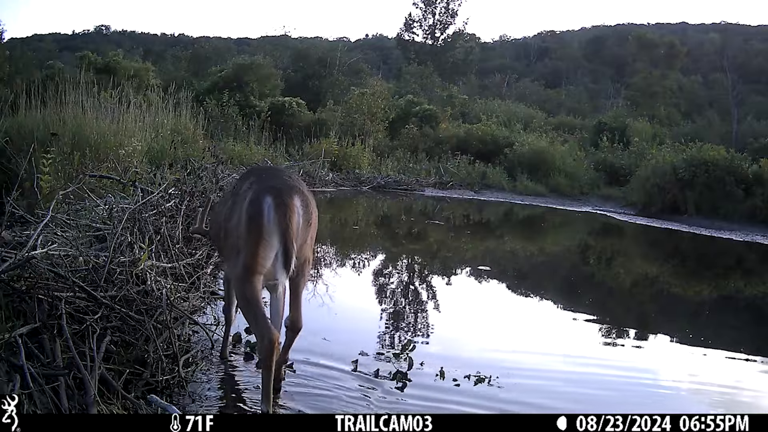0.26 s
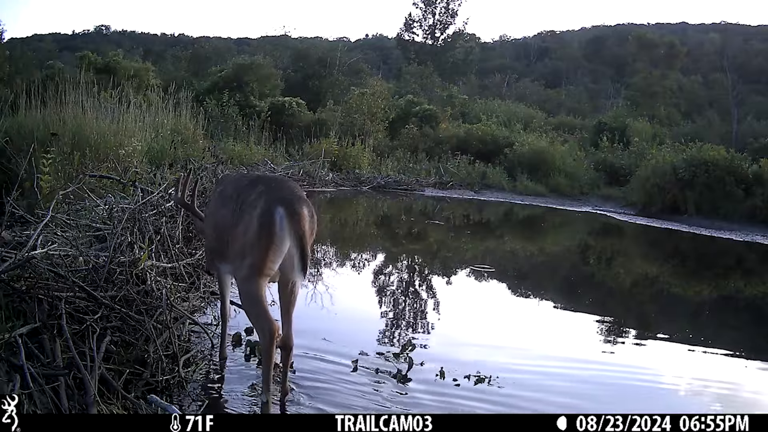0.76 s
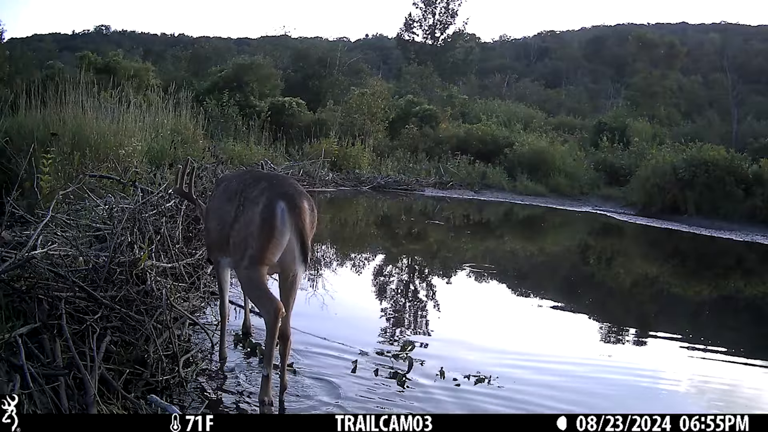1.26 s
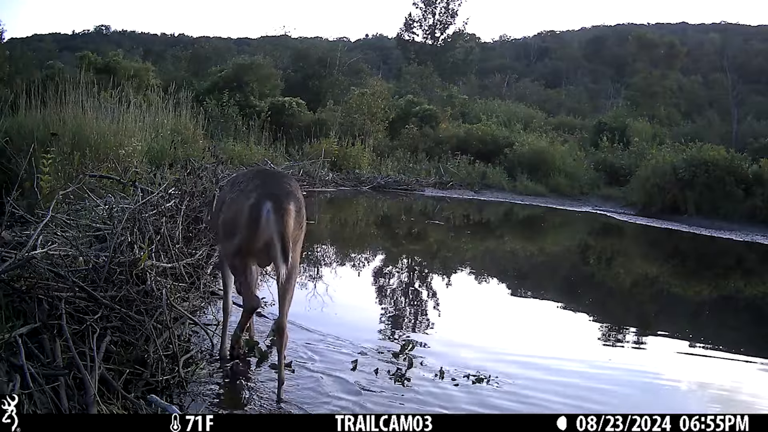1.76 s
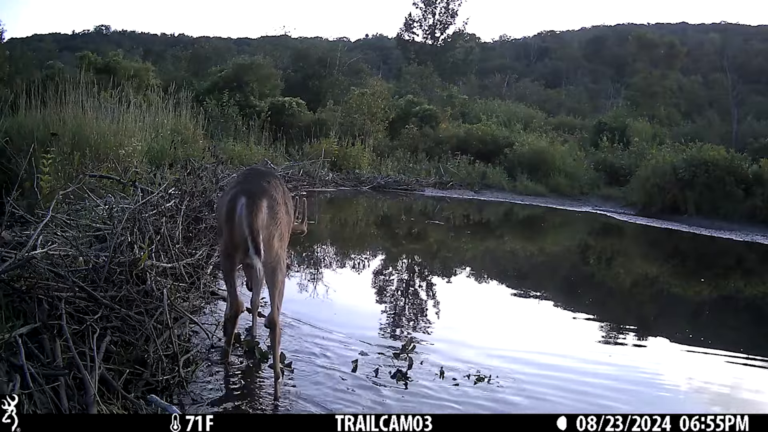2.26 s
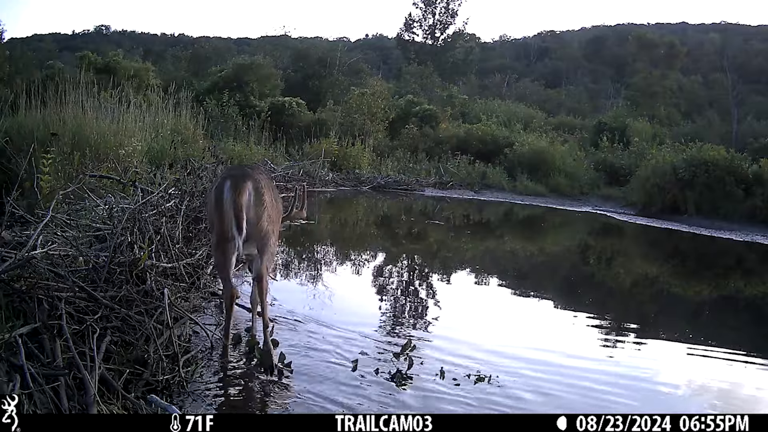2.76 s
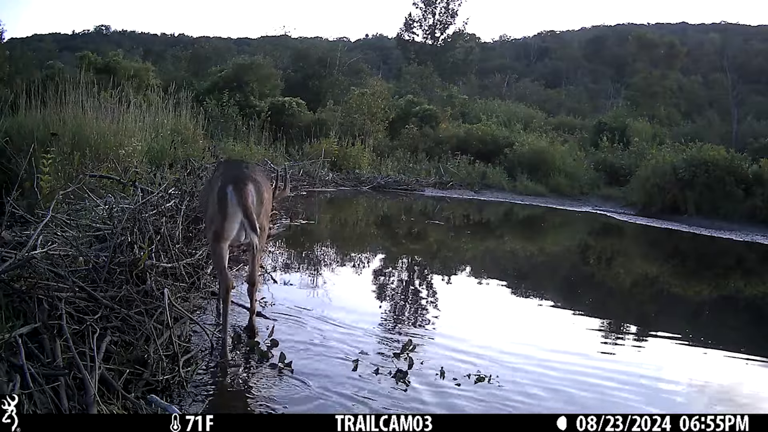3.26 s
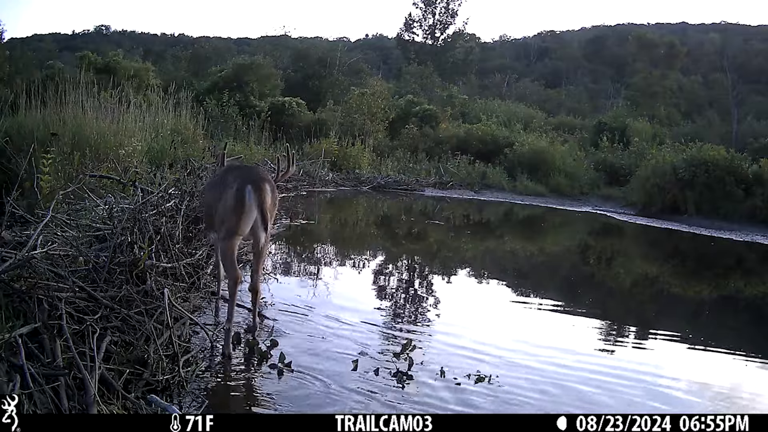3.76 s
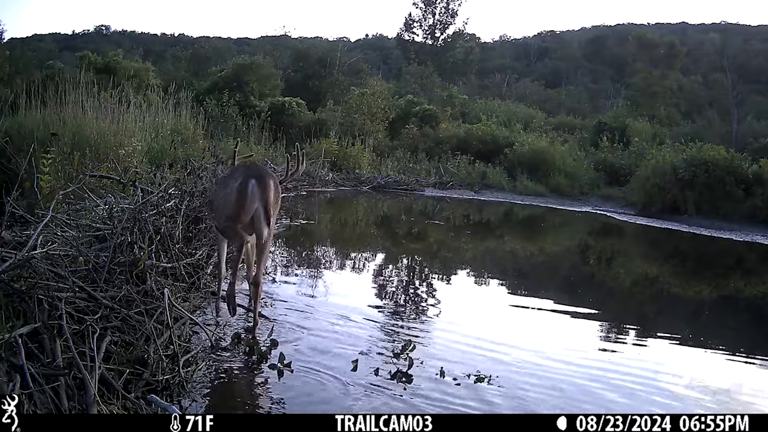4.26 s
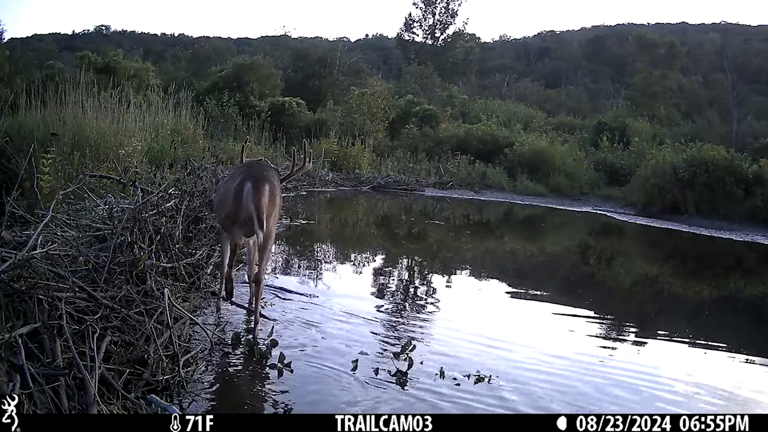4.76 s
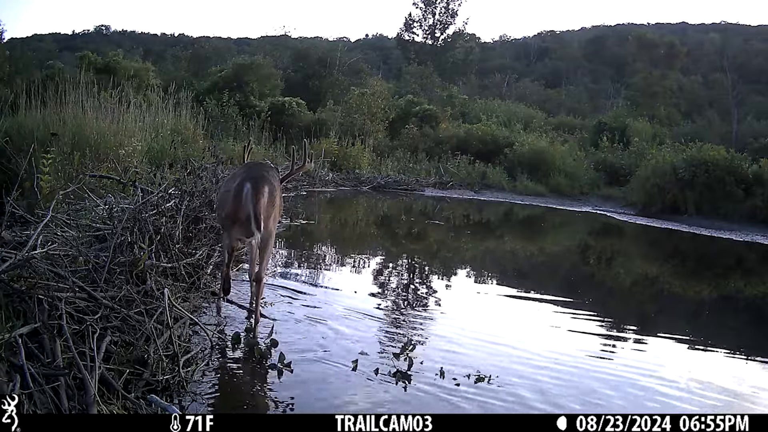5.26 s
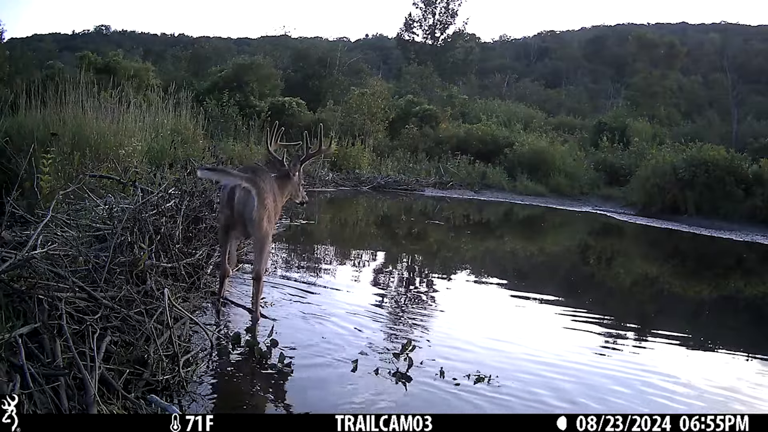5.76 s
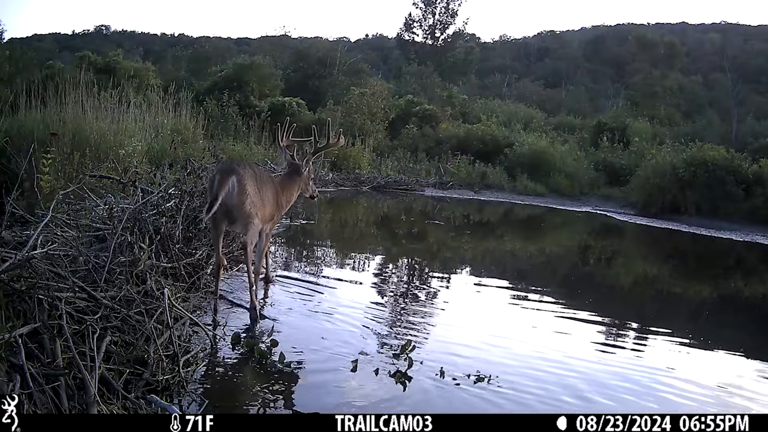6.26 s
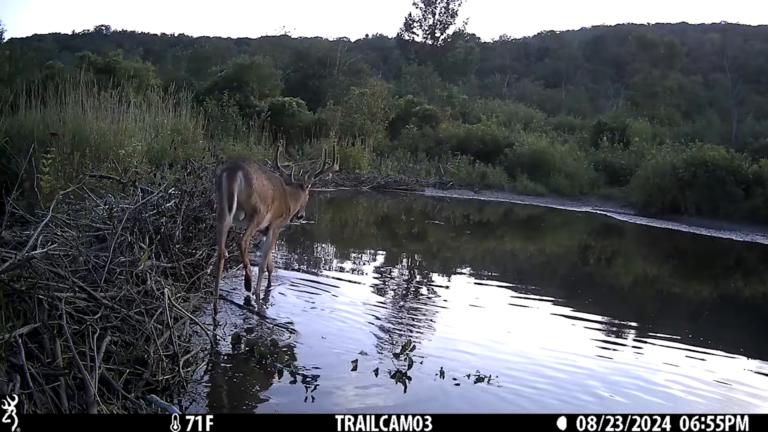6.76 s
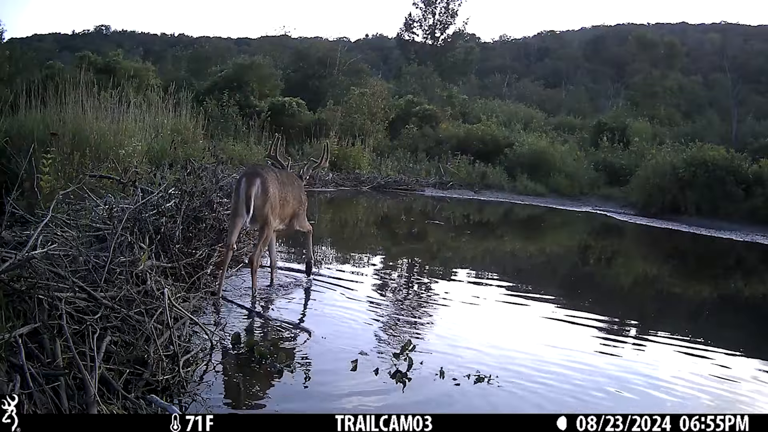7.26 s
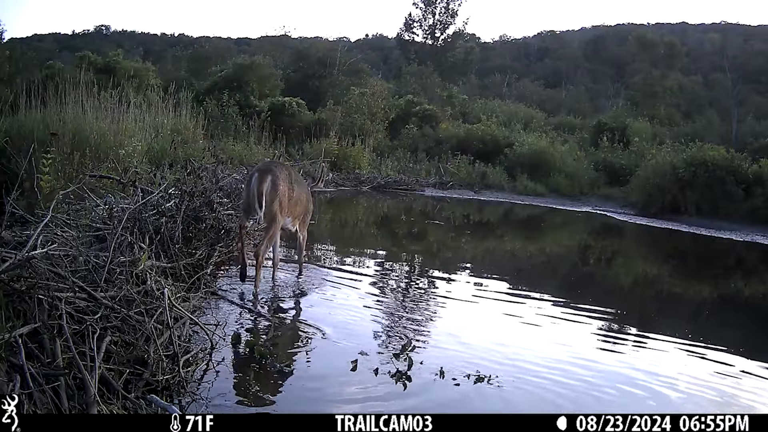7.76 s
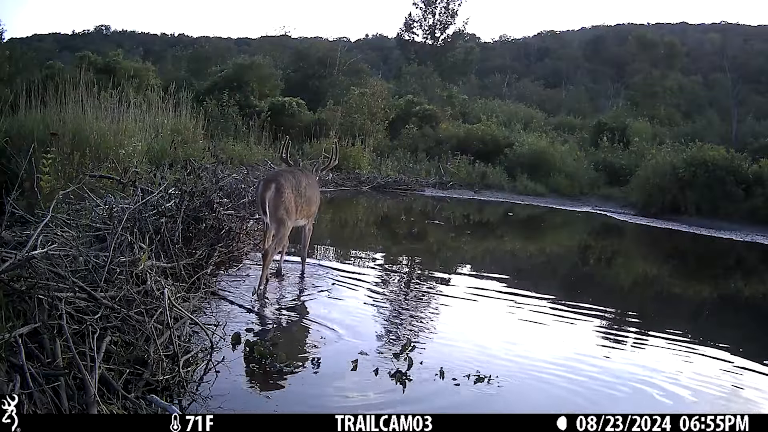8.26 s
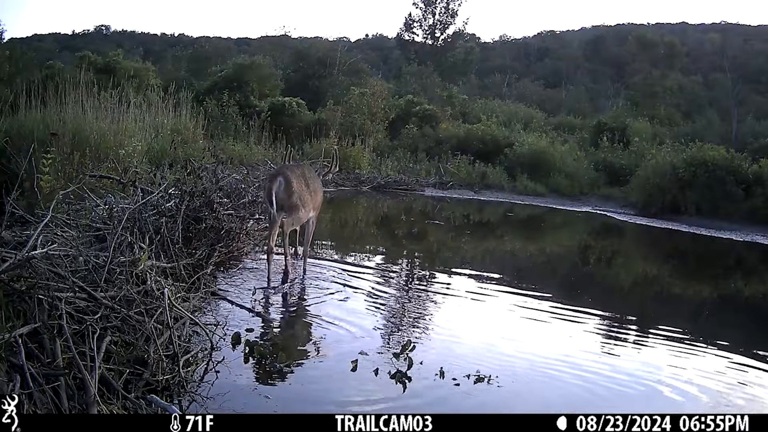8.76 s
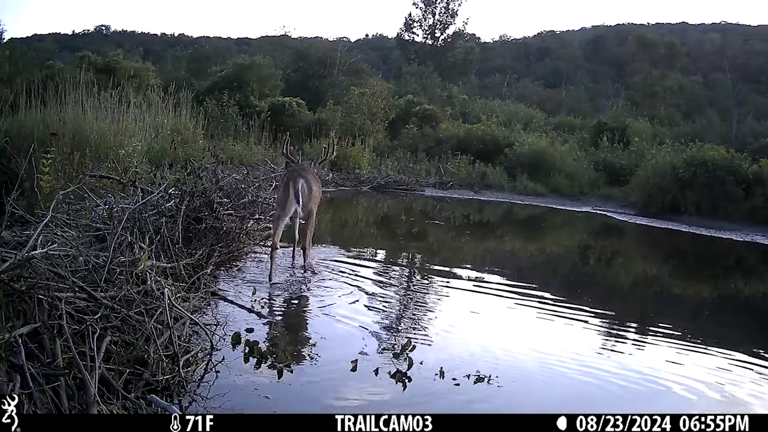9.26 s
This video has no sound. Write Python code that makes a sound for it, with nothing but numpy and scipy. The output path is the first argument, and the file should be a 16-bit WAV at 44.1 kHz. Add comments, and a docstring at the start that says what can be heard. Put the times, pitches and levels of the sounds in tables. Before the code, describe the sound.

A deer wades through a shallow pond, heard through a small microphone that hisses steadily and makes the water sound thin. From the start, its steps make uneven runs of short, light splashes, with ticking drops, soft sloshing and small bubble plops. A stronger splash comes at about 2.4 seconds, and from 2.6 to 3 seconds a dull, low thump shudders close by and dies away. Small splashes follow around 3.5 and 4 seconds. The water then quietens to faint gurgles and a gentle slosh until nearly 6 seconds. The steps pick up again, with clusters of splashes and drips from 6 to about 7.7 seconds and a rounder plop just after 7. A few drops fall a little after 8 seconds, and the sharpest splashes come between 8.9 and 9.5 seconds.

```python
"""Deer wading a shallow pond

Drops smack the surface and trapped air bubbles ring briefly. Spray, droplets and slosh fill
each stride, faint gurgles the gaps; once something low shudders close by. The microphone is a
small one behind a resonant port, and adds its own steady hiss."""
import sys
import numpy as np
from scipy import signal
from scipy.fft import rfft, irfft
from scipy.io import wavfile
from scipy.ndimage import uniform_filter1d

SR = 44100
rng = np.random.default_rng(int(sys.argv[2]) if len(sys.argv) > 2 else 0)


def store_pcm(level_fs):
    """Save levels as 16-bit WAV."""
    pcm = np.round(np.clip(level_fs, -1, 1) * 32767).astype(np.int16)
    wavfile.write(sys.argv[1], SR, np.atleast_2d(pcm).T)


N = 419832
PORT_HZ, PORT_WIDTH_HZ, PORT_TOP_HZ = 3200, 560, 4100

# Drops hitting the pond. Each row: start in seconds, pitch in Hz, peak in dB ahead of the port,
# time to fall 60 dB (t60) in milliseconds.
DROP_IMPACTS = [(0.5242, 3300, -30.5, 16), (0.5341, 2950, -25.5, 8.8), (0.6689, 2300, -35, 15),
                (0.668, 3280, -22.5, 4.4), (0.8222, 3230, -28.5, 14), (0.836, 3860, -40, 15),
                (0.931, 3240, -28.5, 24), (0.938, 2720, -28.5, 24), (1.296, 3220, -20, 13),
                (1.497, 3770, -35, 15), (1.5568, 4050, -36, 2.8), (1.5835, 3500, -25, 4.2),
                (1.59, 4280, -31.5, 4.2), (1.616, 3400, -38, 9), (1.699, 3240, -42, 27),
                (1.6036, 3420, -37.5, 24), (2.0388, 3045, -19.5, 8.1), (2.0572, 3150, -26.5, 3.3),
                (2.3876, 3260, -24.5, 24), (2.4275, 3160, -21.5, 4.3), (2.4385, 3200, -34, 14),
                (2.6396, 3090, -29, 17), (2.7056, 2930, -33, 6.1), (2.7254, 2780, -40, 31),
                (2.7388, 3600, -29, 2.5), (2.823, 3400, -42, 11), (2.861, 3040, -35, 4.2),
                (3.5215, 2690, -32.5, 5.3), (3.643, 2420, -34.5, 7.9), (4.033, 2330, -33, 14),
                (4.0439, 3250, -29.5, 10.5), (4.1071, 2960, -24, 8.4), (4.8585, 3000, -37, 7),
                (5.9886, 3380, -43, 21), (6.2024, 3110, -34, 34), (6.2178, 3510, -28, 13),
                (6.2367, 3030, -35.5, 8.6), (6.3917, 2760, -31, 11), (6.4279, 1600, -26, 7.1),
                (6.436, 1370, -25, 10.5), (6.4622, 3200, -27.5, 13), (6.4779, 3180, -29, 11),
                (6.531, 3500, -38, 3.7), (6.5459, 3020, -29.5, 2.2), (6.553, 3400, -39, 14),
                (7.0222, 2430, -36, 17), (7.0683, 3040, -18.5, 2.6), (7.1578, 3270, -26.5, 20),
                (7.177, 2550, -36, 2.8), (7.2263, 3100, -36, 34), (7.242, 2250, -31.5, 21),
                (7.2527, 2450, -37, 24), (7.308, 2440, -32.5, 8.3), (7.3133, 3400, -33.5, 18),
                (7.4402, 3320, -32, 2.7), (7.517, 3270, -45.5, 35), (7.6323, 3030, -33.5, 9.7),
                (7.694, 3270, -39, 24), (7.7488, 2360, -36.5, 11), (8.1978, 2940, -24, 2.5),
                (8.218, 3140, -31.5, 9), (8.2314, 3450, -29.5, 3.9), (8.36, 3290, -28.5, 14),
                (8.548, 2360, -39, 35), (8.8947, 3140, -25.5, 14), (8.917, 3310, -37, 12),
                (8.9907, 3250, -37, 37), (9.0022, 2350, -39, 14), (9.013, 3150, -31, 13),
                (9.022, 3330, -17, 8.3), (9.0376, 1970, -16.5, 2.5), (9.038, 1430, -19, 5.7),
                (9.0561, 3240, -26, 5.3), (9.1461, 3410, -31.5, 13), (9.2038, 3460, -23.5, 5.7),
                (9.35, 3320, -29, 2.1), (9.3633, 3300, -23, 4.2), (9.4268, 2230, -36, 30),
                (9.4332, 2840, -31, 16), (9.4656, 3430, -34, 40), (9.468, 1920, -21, 8.9),
                (9.4695, 3500, -14, 2), (9.514, 1010, -22, 9.3)]


def smacks():
    """Each drop strikes the surface and rings for an instant."""
    return dying_sines(DROP_IMPACTS, onset_s=0.00017)


def bubbles():
    """Larger pockets of trapped air ring; most climb in pitch as they near the surface."""
    # Each row: start in seconds, pitch in Hz, peak in dB ahead of the port, t60 in milliseconds,
    # glide as a share of the pitch per second.
    air_bubbles = [(0.0156, 1830, -39, 43, -7.5), (0.6417, 970, -41.5, 45, 2),
                   (0.9371, 1400, -40.5, 37, 20), (1.2214, 1025, -46, 67, 3), (2.3951, 789, -35.5, 92, -1),
                   (2.4095, 1430, -35, 46, 5.5), (2.4405, 1765, -29.5, 25, -2.5),
                   (2.632, 1530, -37, 24, 15), (2.737, 1680, -40.5, 34, -2.5), (2.8228, 1490, -39.5, 25, 2),
                   (3.4247, 680, -44.5, 120, -1.5), (3.6307, 1810, -32, 19, 2),
                   (4.0613, 1004, -42, 46, 10.5), (4.085, 1574, -40.5, 49, 4), (4.6, 340, -48.5, 95, 2),
                   (4.887, 1590, -42.5, 62, 1), (4.97, 290, -37.5, 18, 7), (5.0731, 1300, -42, 21, 27),
                   (5.338, 880, -39, 47, 24.5), (5.8796, 347, -40.5, 64, 17), (6.4623, 452, -45, 57, 6),
                   (7.0663, 344, -37.5, 44, -4), (7.0677, 546, -38, 25, 22), (7.068, 1600, -36.5, 19, 12),
                   (7.1091, 394, -24, 14, -17), (7.118, 594, -37, 51, 15.5), (7.5919, 1530, -43, 27, -10),
                   (9.0, 975, -41, 50, -2.5), (9.0802, 1420, -46, 28, 21), (9.197, 806, -38.5, 170, 30),
                   (9.2032, 1260, -35.5, 16, 47), (9.4243, 935, -35, 49, 5), (9.4255, 310, -39.5, 40, 2),
                   (9.4681, 346, -37, 29, 1), (9.4677, 1450, -24, 13, 5), (9.4694, 910, -23, 5.4, 46)]
    return dying_sines(air_bubbles, onset_s=0.00032)


def strides():
    """Gains of spray and slosh: each stir of a leg swells, holds and dies over the calm ripple."""
    # Each row: start in seconds, length in seconds, spray level in dB, slosh level in dB.
    leg_stirs = [(0.012, 0.15, -63, -56), (0.38, 0.12, -66, -54), (0.49, 0.17, -61.5, -60),
                 (0.8, 0.017, -57, -78), (0.919, 0.076, -55.5, -60), (1.207, 0.16, -69, -60.5),
                 (1.462, 0.019, -54, -57), (1.552, 0.21, -59, -62.5), (2.02, 0.03, -57, -81),
                 (2.39, 0.041, -49.5, -48), (2.633, 0.016, -46.5, -49), (2.684, 0.26, -59, -60),
                 (3.39, 0.13, -60, -60.5), (3.625, 0.03, -60, -53.5), (3.794, 0.25, -59, -73),
                 (4.019, 0.086, -54.5, -61), (4.78, 0.46, -83, -62), (5.813, 0.097, -62, -57.5),
                 (5.952, 0.09, -57.5, -62), (6.168, 0.1, -52.5, -72), (6.405, 0.073, -52.5, -54.5),
                 (6.982, 0.42, -55.5, -56.5), (7.155, 0.092, -47, -53), (7.293, .1, -53, -67.5),
                 (7.55, 0.19, -55, -59.5), (8.181, 0.025, -51.5, -68), (8.516, 0.16, -63, -61),
                 (8.889, 0.026, -38, -50), (8.937, 0.056, -46.5, -53), (9.002, 0.04, -52, -45.5),
                 (9.175, 0.07, -55, -56), (9.35, 0.017, -48.5, -72), (9.417, 0.019, -47.5, -46.5),
                 (9.477, .05, -48, -44.5)]
    attack_s, t60_s = 0.013, 0.39
    calm_spray_db, calm_slosh_db = -67.5, -64
    t = np.arange(N) / SR
    power = from_db([[calm_spray_db], [calm_slosh_db]]) ** 2 * np.ones(N)
    for start, length, *levels_db in leg_stirs:
        span = slice(max(round((start - attack_s) * SR), 0), round((start + length + t60_s) * SR))
        swell = np.clip(1 + (t[span] - start) / attack_s, 0, 1)
        decay = from_db(-60 * np.maximum(t[span] - start - length, 0) / t60_s)
        power[:, span] += (from_db(levels_db)[:, None] * swell * decay) ** 2
    return np.sqrt(power)


def slosh(gain):
    """Water pushed by a leg: a crowd of short rings over a smooth rush."""
    rings = grains(400, 700, 2000, cycles=30, spread_db=3.2, clump_db=5)
    rush = band_noise(650, 2300, order=2)
    return gain * (rings + from_db(-4.5) * rush)


def spray(stir_gain):
    """Tiny drops, thrown by legs and smacks, tick broadly; the microphone port rings on each."""
    ticks = grains(700, 1800, 3900, cycles=7.4, spread_db=2.5, clump_db=6)
    radius = np.exp(-np.pi * PORT_WIDTH_HZ / SR)
    angle = 2 * np.pi * PORT_HZ / SR
    port = signal.lfilter([1, 0, -1], [1, -2 * radius * np.cos(angle), radius ** 2], ticks)
    gain = stir_gain + smack_envelope(below_db=21, t60_s=0.045)
    return gain * rms_one(rms_one(port) + 0.21 * ticks)


def puffs():
    """Each smack bursts as a short puff of noise around the port's pitch."""
    gain = uniform_filter1d(smack_envelope(below_db=10, t60_s=0.016), size=64)
    return gain * band_noise(2300, 3700, order=3)


def droplets(stir_gain):
    """Sparser drops fall with the spray and ring longer."""
    return from_db(-7) * stir_gain * grains(70, 2100, 3800, cycles=25, spread_db=4, clump_db=4)


def gurgles():
    """Faint scattered rings in the water, heard between the steps."""
    return from_db(-63) * grains(14, 650, 2000, cycles=70, spread_db=1.8, clump_db=3.5)


def shudder():
    """A low tone with an unsteady, sagging pitch and a weak overtone; it throbs as it dies."""
    # Each row: time of a throb's peak in seconds, level in dB.
    throbs = [(2.645, -38.5), (2.69, -36), (2.742, -31), (2.83, -40), (2.87, -45), (2.945, -45),
              (3.07, -54), (3.15, -54)]
    start_s, start_hz, end_hz, sag_s = 2.627, 64, 30, 0.33
    rise_s, fall_s = 0.03, 0.018
    t = np.arange(N) / SR
    age = np.maximum(t - start_s, 0)
    hz = end_hz + (start_hz - end_hz) * np.exp(-age / sag_s)
    phase = 2 * np.pi * np.cumsum(hz * (1 + 0.07 * drift(22))) / SR
    tone = np.sin(phase) + 0.17 * np.sin(2 * phase)
    gain = np.zeros(N)
    for peak_s, level_db in throbs:
        width_s = np.where(t < peak_s, rise_s, fall_s)
        gain += from_db(level_db) * np.exp(-((t - peak_s) / width_s) ** 2)
    onset = np.minimum(age / 0.013, 1)
    return onset * gain * np.sqrt(2) * tone


def microphone_hiss(level_db, waver_db):
    """The microphone's own coloured noise; the part below 1800 Hz wavers a little."""
    # Each row: frequency in Hz, relative noise density in dB.
    hiss_spectrum = [(15, -19), (25, 4.5), (80, 2.5), (118, -1), (187, 2.5), (600, -0.5), (1620, -12.5),
                     (2330, -16.5), (3110, -12), (3960, -20.5), (4810, -11), (5300, -18), (5980, -25.5),
                     (7800, -28), (8300, -50.5)]
    knot_hz, knot_db = np.array(hiss_spectrum).T
    hz = np.maximum(np.fft.rfftfreq(N, 1 / SR), 1)
    colour = from_db(np.interp(np.log(hz), np.log(knot_hz), knot_db))
    colour[hz > 9086] = 0
    noise = rms_one(irfft(rfft(rng.standard_normal(N)) * colour, N))
    low = signal.sosfiltfilt(signal.butter(2, 1800, fs=SR, output="sos"), noise)
    return from_db(level_db) * (noise - low + low * from_db(waver_db * drift(2.75)))


def dying_sines(rows, onset_s):
    """One sine per row that swells quickly and dies; a longer ring swells more slowly."""
    out, t = np.zeros(N + SR), np.arange(SR // 8) / SR
    for (start, hz, peak_db, t60_ms, *glide), turn in zip(rows, rng.random(len(rows))):
        climb = sum(glide) * t   # zero for a row without a glide
        swell = (1 - np.exp(-t / (onset_s + 0.03 * t60_ms / 1000))) ** 3
        decay = from_db(-60e3 * t / max(t60_ms, 2))
        burst = np.exp(-(climb / 0.8) ** 4)   # a bubble ends once it has glided far enough
        shape = swell * decay * burst
        tone = np.sin(2 * np.pi * (hz * t * (1 + climb / 2) + turn))
        at = round(start * SR)
        out[at:at + len(t)] += from_db(peak_db) * shape / shape.max() * tone
    return out[:N]


def smack_envelope(below_db, t60_s):
    """A gain that jumps at each smack and dies; smacks pitched below the port kick it less."""
    kicks = np.zeros(N)
    for start, hz, peak_db, _ in DROP_IMPACTS:
        kicks[round(start * SR)] = from_db(peak_db - below_db) * min(hz / PORT_HZ, 1) ** 2
    return signal.lfilter([1], [1, -from_db(-60 / (t60_s * SR))], kicks + 1e-18)


def grains(per_s, low_hz, high_hz, cycles, spread_db, clump_db):
    """Random clicks in clumps, dealt to 16 resonators of equal energy; unit rms."""
    sizes = from_db(spread_db * np.minimum(rng.exponential(1, N), 3)) * rng.choice([-1, 1], N)
    clicks = sizes * (rng.random(N) < per_s * from_db(clump_db * drift(25)) / SR)
    dealt = rng.integers(0, 16, N)
    return rms_one(sum(np.sqrt(hz) * ring(clicks * (dealt == k), hz, cycles / hz)
                       for k, hz in enumerate(np.geomspace(low_hz, high_hz, 16))))


def ring(clicks, hz, t60_s):
    """A unit click sets a sine of height 1 ringing."""
    radius, angle = from_db(-60 / (t60_s * SR)), 2 * np.pi * hz / SR
    poles = [1, -2 * radius * np.cos(angle), radius ** 2]
    return signal.lfilter([0, np.sin(angle)], poles, clicks + 1e-18)


def band_noise(low_hz, high_hz, order):
    """Band-passed noise of unit rms."""
    band = signal.butter(order, [low_hz, high_hz], "band", fs=SR, output="sos")
    return rms_one(signal.sosfilt(band, rng.standard_normal(N)))


def drift(rate_hz):
    """A random wander of unit rms: noise at every 40th sample, low-passed twice."""
    pole = np.exp(-2 * np.pi * rate_hz * 40 / SR)
    slow = signal.lfilter([1], [1, -2 * pole, pole ** 2], rng.standard_normal(N // 40 + 2002))[2000:]
    return np.interp(np.arange(N) / 40, np.arange(len(slow)), rms_one(slow))


def from_db(db):
    """Decibels to gain."""
    return 10 ** (np.asarray(db) / 20)


def rms_one(x):
    """Scale to unit rms."""
    return x / np.sqrt(np.mean(x ** 2) + 1e-20)


def scene():
    """The pond through the port, which passes little above its resonance; shudder and hiss beside it."""
    spray_gain, slosh_gain = strides()
    rings = smacks() + bubbles() + droplets(spray_gain) + gurgles()
    ripple = from_db(2.5 * drift(150))   # the rippling surface makes each ring ragged
    water = rings * ripple + slosh(slosh_gain) + spray(spray_gain) + puffs()
    water = signal.sosfilt(signal.butter(4, PORT_TOP_HZ, fs=SR, output="sos"), water)
    return (water + shudder() + microphone_hiss(level_db=-53.5, waver_db=1.8))[None]


def record(dry):
    """The top is cut steeply at 8260 Hz, over a trace of converter noise."""
    cut = signal.sosfilt(signal.ellip(10, 0.2, 70, 8260, fs=SR, output="sos"), dry)
    return cut + from_db(-106) * rng.standard_normal(dry.shape)


dry = scene()
out = record(dry)
store_pcm(out)
```